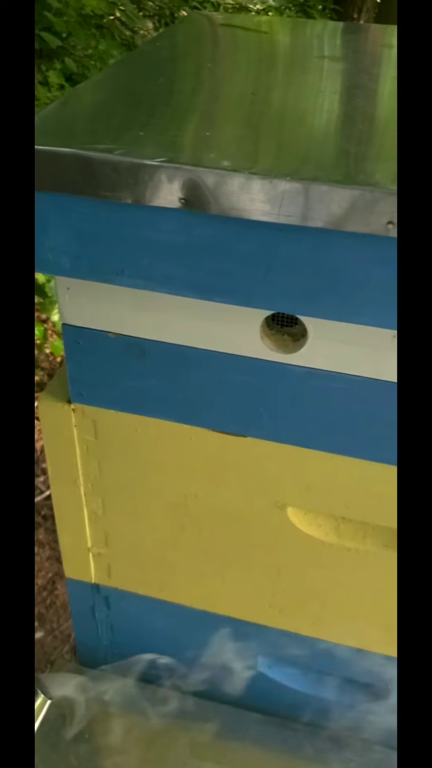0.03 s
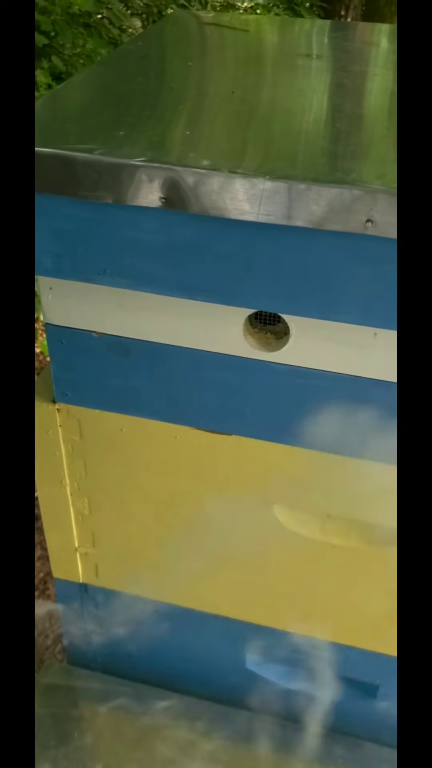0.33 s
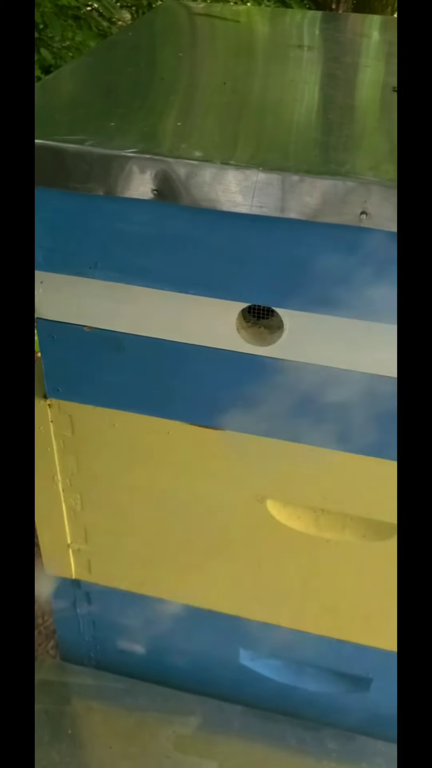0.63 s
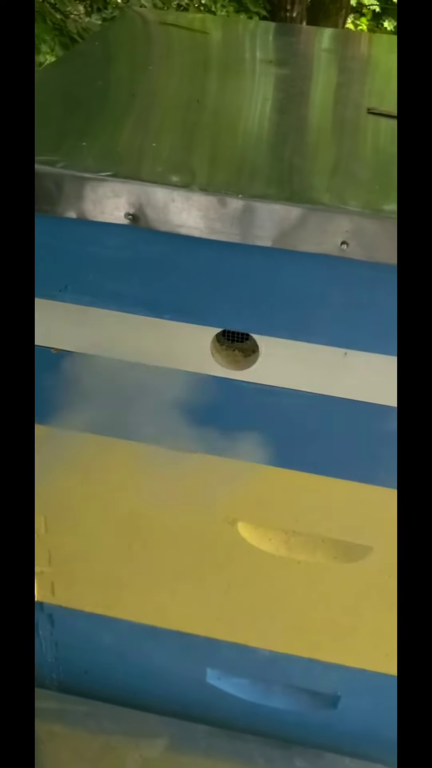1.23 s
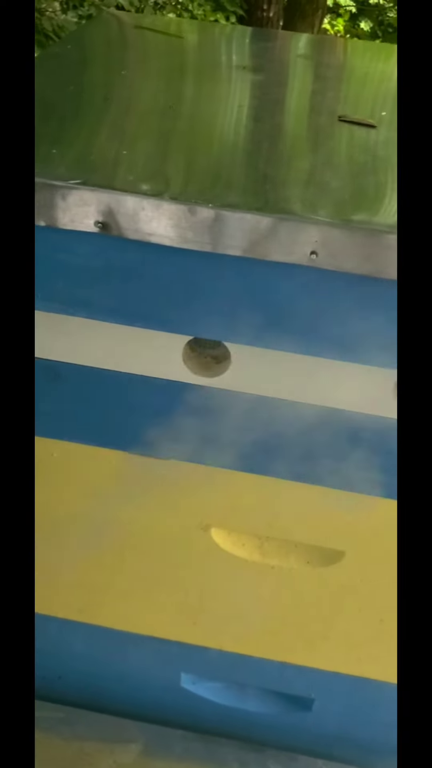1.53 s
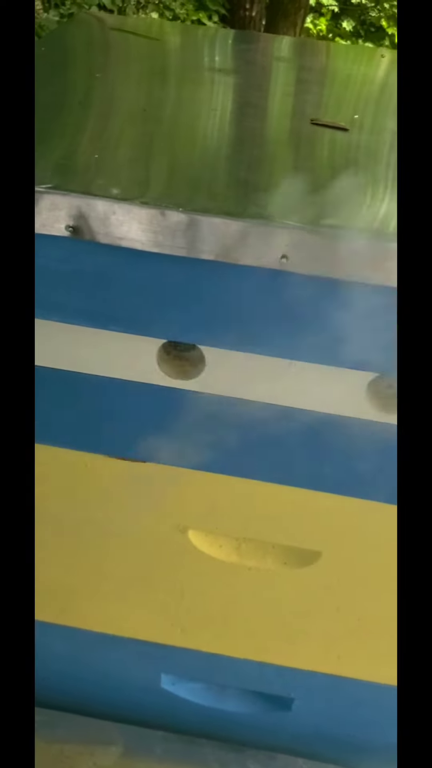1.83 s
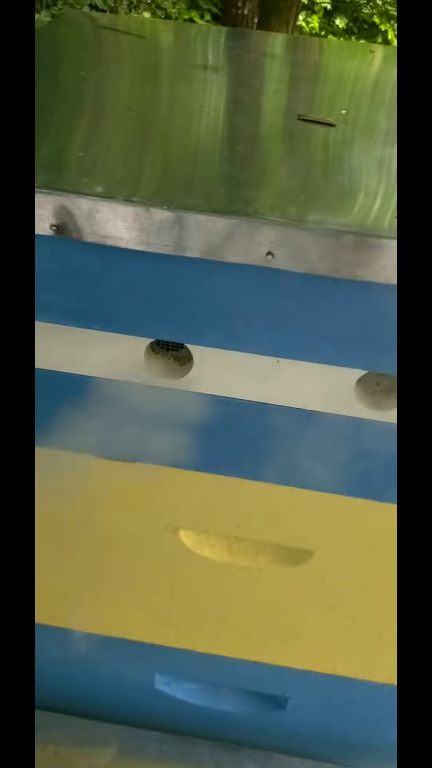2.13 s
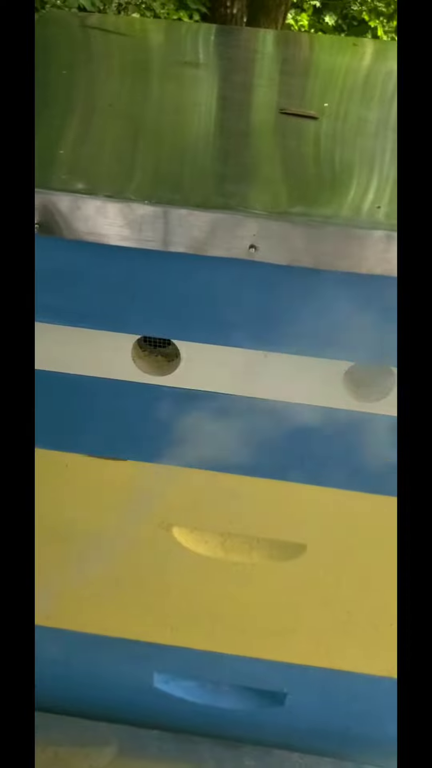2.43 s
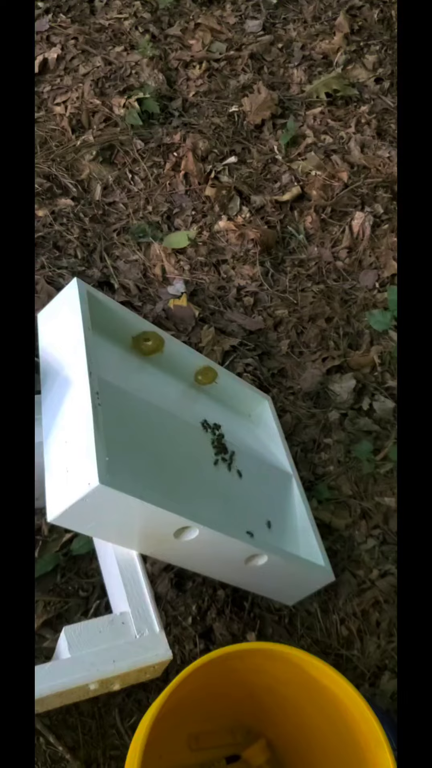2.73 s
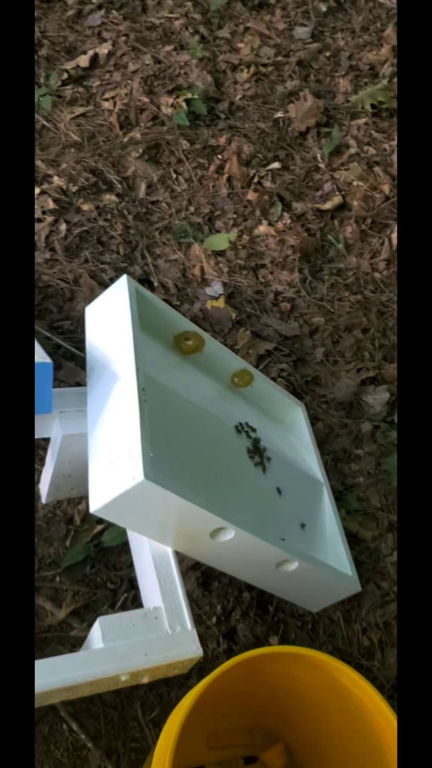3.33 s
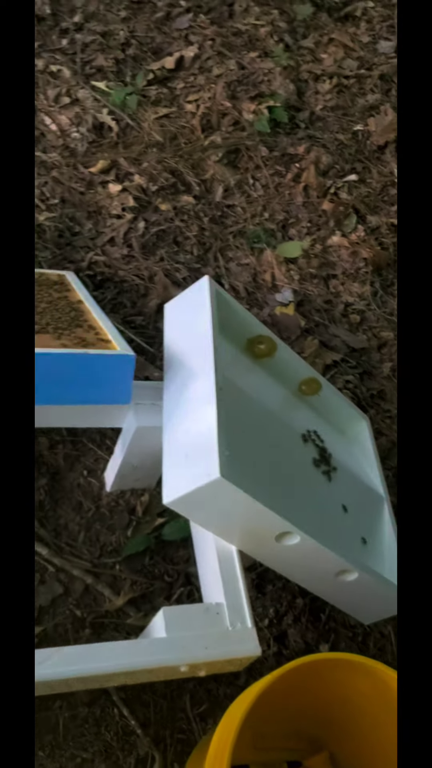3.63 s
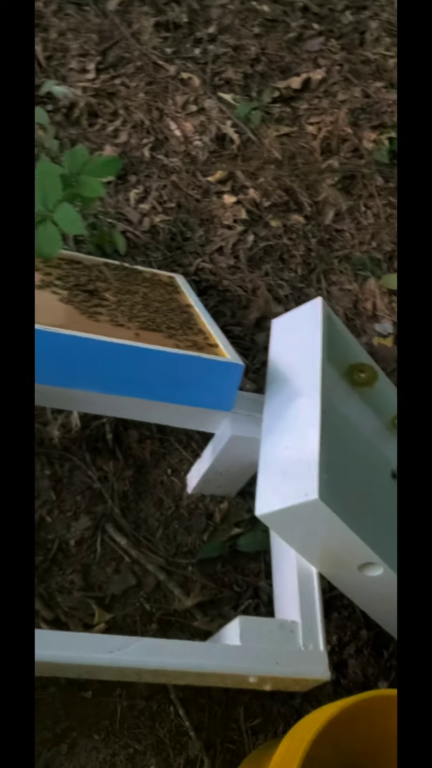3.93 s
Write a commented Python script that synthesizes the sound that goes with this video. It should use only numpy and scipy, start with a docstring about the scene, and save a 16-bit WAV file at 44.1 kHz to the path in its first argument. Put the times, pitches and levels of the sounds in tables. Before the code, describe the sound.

A bee smoker is pumped close by, about four breathy puffs a second, its bellows knocking softly between strokes. After a small bump, a blurred drone of bees comes in abruptly. Low outdoor rumble lies beneath.

```python
"""Bee smoker at the hive

A smoker is pumped eleven times, about four strokes a second. Each squeeze hums in the can and rushes
from the nozzle; the bellows spring back with a soft knock and a thin hiss of intake. Low outdoor
rumble lies beneath. After a bump, a louder rush with a blurred drone of bees comes in abruptly."""
import sys
import numpy as np
from scipy import signal
from scipy.fft import rfft, irfft
from scipy.io import wavfile
from scipy.ndimage import uniform_filter1d

SR = 44100
rng = np.random.default_rng(int(sys.argv[2]) if len(sys.argv) > 2 else 0)


def generate_wav(signal):
    """Clip the signal to [-1, 1] and save it as 16-bit WAV at the path in sys.argv[1]."""
    frames = np.transpose(np.atleast_2d(signal))
    scaled = np.clip(frames, -1, 1) * 32767
    pcm = np.round(scaled).astype(np.int16)
    wavfile.write(sys.argv[1], SR, pcm)


N = 176400
T = np.arange(N) / SR
F = np.maximum(np.arange(N // 2 + 1) * SR / N, 1)
FLICKER_HZ = 90  # base rate of the fast random wobbles in level and pitch


def undb(db):
    """Decibels to gain."""
    return 10 ** (np.asarray(db) / 20)


def unit(x):
    """Scale to rms 1."""
    return x / np.sqrt(np.mean(x ** 2))


def across(points):
    """Join (Hz, value) points on a log-frequency axis."""
    hz, value = np.array(points).T
    return np.interp(np.log(F), np.log(hz), value)


def along(points):
    """A fader ride: gain that follows (seconds, dB) points."""
    return undb(np.interp(T, *np.array(points).T))


def humps(peaks):
    """EQ curve in dB from (Hz, width in Hz, dB) resonances or dips."""
    return sum(db / (1 + (2 * (F - hz) / width) ** 2) for hz, width, db in peaks)


def pan(db):
    """Left and right gains for a level difference; positive leans left."""
    return undb(np.array([[1], [-1]]) * db / 2)


def swell(centre, width, squareness=2):
    """A bell-shaped rise and fall; more squareness flattens the top and steepens the sides."""
    return np.exp(-.5 * abs((T - centre) / width) ** squareness)


def fade(start, decay):
    """A sudden start and an exponential fall."""
    return (T > start) * np.exp(-abs(T - start) / decay)


def walk(rate_hz):
    """Smooth random drift with spread 1."""
    return unit(irfft(rfft(rng.standard_normal(N)) * np.exp(-(F / rate_hz) ** 2) * (F > 1), N))


def ring(modes):
    """Impulse response of damped modes."""
    t = T[:8192]
    return sum(undb(db) * np.cos(2 * np.pi * hz * t) * np.exp(-np.log(1000) * t / t60)
               for hz, db, t60 in modes)


# Stereo image of the open air. Each row: frequency in Hz, left-right correlation.
WIDE_IMAGE = [(60, 0.97), (150, 0.96), (300, 0.87), (600, 0.49), (1200, 0.045), (4000, 0.021)]
def noise(colour_db, pan_db=0, image=WIDE_IMAGE):
    """Coloured stereo noise at rms 1, narrow in the bass and wide in the treble."""
    mid, side = rfft(rng.standard_normal((2, N)))
    alike = np.clip(across(image), -1, 1)
    stereo = mid * np.sqrt(1 + alike) + np.array([[1], [-1]]) * side * np.sqrt(1 - alike)
    return unit(irfft(stereo * undb(colour_db) * pan(pan_db), N))


# Tone of the outdoor rumble. Each row: frequency in Hz, relative level in dB.
RUMBLE_TONE = [(20, -27), (38, -2.5), (100, 2.5), (165, -8.5), (400, -16), (800, -21.5), (1700, -31),
               (3200, -40), (7000, -48), (10000, -46.5), (16000, -54)]
# Its lean. Each row: frequency in Hz, left over right in dB.
RUMBLE_PAN = [(500, -.5), (1300, 2.5), (11000, 7)]
# Tone of the high hiss. Each row: frequency in Hz, relative level in dB.
HISS_TONE = [(1700, -25), (2450, 8.5), (3200, -17.5), (4600, -2), (7000, -18.5), (11100, 3.5), (13000, -6),
             (16000, -8)]
# Its fader ride. Each row: time in seconds, level in dB.
HISS_RIDE = [(0, -69.5), (.55, -68), (.75, -88), (2.15, -100), (2.45, -60.5), (2.75, -64), (3.05, -75),
             (3.7, -71), (3.95, -64)]
def outdoors(rumble_db=-45.5):
    """The bed: a steady low rumble and a thin hiss that comes and goes."""
    rumble = undb(rumble_db) * noise(across(RUMBLE_TONE), across(RUMBLE_PAN))
    hiss = noise(across(HISS_TONE)) * along(HISS_RIDE)
    return rumble + hiss


def bees(count=14, wing_hz=196.2, spread=.1, wander=0.0406, rolloff_db=-13.5):
    """Many wingbeats, each wandering in pitch and level, blur into one drone."""
    out = 0
    for place in np.linspace(-1, 1, count):
        hz = wing_hz * np.exp(spread * place + wander * walk(7.3))
        phase = 2 * np.pi * np.cumsum(hz) / SR
        wings = sum(undb(rolloff_db * k) * np.sin((k + 1) * phase) for k in range(4))
        out = out + wings * undb(2 * walk(4.2)) * pan(2 * rng.standard_normal())
    return unit(out)


# Tone of the low noise around the bees. Each row: frequency in Hz, relative level in dB.
DRONE_TONE = [(25, -40), (55, -5), (150, 1.5), (220, -4), (400, -10.5), (650, -23.5), (4000, -55)]
# Fader ride of that noise and the bees together. Each row: time in seconds, gain in dB.
DRONE_RIDE = [(3.07, -40.5), (3.2, -37.5), (3.42, -34), (3.55, -35), (3.68, -38.5), (4, -39.5)]
# Tone of the rush above them. Each row: frequency in Hz, relative level in dB.
RUSH_TONE = [(300, -15), (700, -1.5), (1200, -11.5), (2000, -10.5), (4000, -14.5), (7200, -23),
             (11000, -24), (16000, -28.5)]
def hive(start_s=3.07, bees_db=-6.5, rush_db=-51):
    """A steady rush and a swelling low drone with bees in it start abruptly."""
    drone = (noise(across(DRONE_TONE)) + undb(bees_db) * bees()) * along(DRONE_RIDE)
    rush = undb(rush_db) * noise(across(RUSH_TONE), pan_db=3)
    gate = np.clip((T - start_s) / 0.0013, 0, 1)
    return (drone + rush) * gate


# Handling ticks. Each row: start in seconds, gain in dB.
HANDLING_TICKS = [(2.979, -57), (2.9882, -46)]
# Their woody ring. Each row: frequency in Hz, relative level in dB, 60 dB decay time in seconds.
WOOD_MODES = [(680, 1, 0.0095), (1830, 0, 0.014), (2450, -7, 0.01), (4640, -14, .004)]
def bump(centre_s=3.004, width_s=0.0061, hz=63.4, thud_db=-33):
    """Two small woody ticks, then a low handling thud far to the right."""
    thud = -np.cos(2 * np.pi * hz * (T - centre_s)) * swell(centre_s, width_s)
    wood = ring(WOOD_MODES)
    ticks = sum(undb(db) * np.interp(T - start, T[:len(wood)], wood, left=0, right=0)
                for start, db in HANDLING_TICKS)
    return undb(thud_db) * thud * pan(-19) + ticks


# Early reflections off the hive wall and lid. Each row: delay in seconds, gain.
HIVE_REFLECTIONS = [(.00402, .36), (.0059, .22)]
def beside_hive(x, hand_sway=0.051):
    """Short reflections colour the sound and drift as the hand moves."""
    out = x
    for delay, gain in HIVE_REFLECTIONS:
        late = delay * (1 + hand_sway * np.sin(2 * np.pi * (T / T[-1] + rng.random())))
        out = out + gain * np.array([np.interp(T - late, T, channel) for channel in x])
    return out


# High whistles. Each row: start in seconds, length in seconds, mid pitch in Hz, glide in Hz a second.
GAP_WHISTLES = [(1.108, .09, 10450, 5500), (1.195, .085, 10820, 3500), (1.34, .06, 11000, 9000),
                (1.52, .05, 10480, -12000)]
def whistles(level_db=-68.5, flicker_db=4, waver=.011):
    """Faint wavering whistles of air through a narrow gap, each gliding up or down."""
    out = np.zeros(N)
    for start, length, hz, glide in GAP_WHISTLES:
        progress = np.clip((T - start) / length, 0, 1)
        flow = np.sqrt(np.sin(np.pi * progress).clip(0))
        pitch = hz * (1 + waver * walk(FLICKER_HZ)) + glide * length * (progress - .5)
        gain = undb(level_db + flicker_db * walk(FLICKER_HZ))
        out += gain * flow * np.sin(2 * np.pi * np.cumsum(pitch) / SR)
    return out * pan(3)


# Air drawn back into the bellows. Each row: centre in seconds, width in seconds, level in dB.
BREATHS = [(.44, 0.075, -61.5), (.65, 0.051, -62.5), (.885, 0.039, -61.5), (1.17, 0.13, -61.5),
           (1.397, 0.052, -57.5), (1.62, 0.035, -62.5), (1.86, 0.016, -65), (2.075, 0.028, -58.5),
           (2.31, 0.04, -59.5), (2.74, 0.18, -61.5)]
# Tone of that air. Each row: frequency in Hz, relative level in dB.
BREATH_TONE = [(800, 8.5), (2400, 6), (3300, -2), (4700, -1), (7000, -8), (9000, -4.5), (11000, 1.5),
               (13000, -6), (16000, -5)]
def intakes(flicker_db=2):
    """Thin hiss as the bellows refill, with a fast random flicker in level."""
    flow = sum(undb(db) * swell(centre, width) for centre, width, db in BREATHS)
    hiss = noise(across(BREATH_TONE), pan_db=2.5)
    return hiss * flow * undb(flicker_db * walk(2 * FLICKER_HZ))


# Knocks of the bellows. Each row: time in seconds, gain in dB, contact width in seconds,
# panel ring and suction in relative dB, share of the blow in the second contact from 0 to 1.
REBOUNDS = [(.4340, -22.5, 0.00057, 6, -10, 0.72), (0.4694, -30, 0.0019, -4, 3, 0.5),
            (0.5226, -30.5, 0.00037, -8, -15, 0), (0.5365, -29.5, 0.00063, -12, -12, 0),
            (0.6998, -27.5, 0.00055, 5, -4.5, 0.19), (0.9103, -23.5, 0.00058, 8.5, -9, 0.54),
            (1.1270, -31.5, 0.00064, 9.5, -15, 0.23), (1.4145, -16, 0.00056, 2.5, -27, 0.48),
            (1.436, -20, 0.0006, 9, -3.5, 0.08), (1.641, -23.5, 0.00054, 2, -7, 0.17),
            (2.0856, -27.5, 0.00044, 3, -7, 0), (2.3107, -28.5, 0.00048, 2, -17, 0.1),
            (2.5477, -28, 0.00054, 4, -2, 0.04)]
# Thump of the air cushion. Each row: frequency in Hz, relative level in dB, 60 dB decay in seconds.
CUSHION_MODES = [(112.4, -17.5, 0.1), (204, -2, 0.022)]
# Ring of the panels. Each row: frequency in Hz, relative level in dB, 60 dB decay in seconds.
PANEL_MODES = [(426, -2, 0.026), (567, -6.5, 0.051), (747, -5, 0.028), (1350, -12, .02)]
def knocks(suction_lead_s=0.0028, second_lag_s=0.0015, scuff_db=-32, scuff_hz=1130):
    """The bellows spring open: suction, then one or two soft contacts ring cushion and panels."""
    out = np.zeros(N)
    cushion, panels = ring(CUSHION_MODES), ring(PANEL_MODES)
    scuff = undb(scuff_db) * noise(-20 * abs(np.log2(F / scuff_hz)))  # 20 dB an octave each side
    for at, db, contact, panel_db, suction_db, share in REBOUNDS:
        blow = (1 - share) * swell(at, contact) + share * swell(at + second_lag_s, contact)
        body = signal.oaconvolve(blow / blow.sum(), cushion + undb(panel_db) * panels)[:N]
        suction = undb(suction_db) * swell(at - suction_lead_s, width=0.0018)
        out = out + undb(db) * (2 * body - suction + scuff * fade(at - contact, decay=0.018))
    return out * pan(-2)


# Stereo image of the nearby can and nozzle. Each row: frequency in Hz, left-right correlation.
CLOSE_IMAGE = [(250, .97), (1300, 0.62), (4000, 0.061), (11000, 0.1)]
def can_hum(hz, width_hz=50.3):
    """The air in the can resonates around one pitch, at a fairly even strength."""
    detune = (F / hz - hz / F) * hz / width_hz
    resonance = noise(-20 * np.log10(1 + detune ** 2 / 2), image=CLOSE_IMAGE)
    running_power = uniform_filter1d(np.mean(resonance ** 2, axis=0), size=700)
    return resonance / np.sqrt(running_power)


# Squeezes of the bellows. Each row: centre in seconds, width in seconds, jet level in dB,
# hum level in dB, can pitch in Hz.
SQUEEZES = [(0.316, 0.025, -47.5, -42.5, 215), (0.56, 0.027, -44, -39, 218), (0.788, 0.025, -47, -42, 215),
            (1.016, 0.025, -48.5, -41.5, 213), (1.289, 0.025, -40.5, -41, 234),
            (1.522, 0.027, -46.5, -40.5, 231), (1.759, 0.028, -47, -45.5, 230),
            (1.975, 0.025, -52, -41.5, 233), (2.207, 0.029, -51, -40, 200.5),
            (2.439, 0.033, -49.5, -39.5, 217), (2.622, 0.023, -52, -42.5, 218)]
# Tone of the jet. Each row: frequency in Hz, relative level in dB.
JET_TONE = [(150, -7), (400, -4), (750, -3), (1200, 2.5), (1700, -2.5), (2600, -7.5), (3500, -9),
            (4500, -12), (5400, -17), (7000, -19.5), (10000, -15), (16000, -21.5)]
# Hollow colour of the nozzle. Each row: centre in Hz, width in Hz, boost or cut in dB.
NOZZLE_EQ = [(1224, 110, 1), (1765, 90, 2.5), (3550, 170, -1), (4660, 330, 2.5)]
# Aim of the nozzle, bass right and treble left. Each row: frequency in Hz, left over right in dB.
NOZZLE_PAN = [(300, -7.5), (1400, -1.5), (4000, 3), (11000, 9.5)]
def puffs(sputter_db=1.1, hum_stretch=1.36):
    """Each squeeze drives a sputtering jet; the can hums a little longer, its pitch set per stroke."""
    jet = noise(across(JET_TONE) + humps(NOZZLE_EQ), across(NOZZLE_PAN), CLOSE_IMAGE)
    jet = unit(beside_hive(jet))
    flow = sum(undb(db) * swell(centre, width, squareness=2.23) for centre, width, db, _, _ in SQUEEZES)
    hum = sum(undb(db) * swell(centre, width * hum_stretch, squareness=3.1) * can_hum(hz)
              for centre, width, _, db, hz in SQUEEZES)
    sputter = undb(sputter_db * walk(FLICKER_HZ))
    return jet * flow * sputter + hum * pan(-1)


def from_right(x, lag_s):
    """The smoker is to the right, so the left channel hears it a little later."""
    return np.array([np.interp(T - lag_s, T, x[0]), x[1]])


def scene():
    """The smoker close by, its nozzle nearer the centre than its bellows, over the background."""
    bellows = from_right(knocks() + beside_hive(intakes()), lag_s=0.000225)
    nozzle = from_right(puffs(), lag_s=0.00015)
    return nozzle + bellows + whistles() + outdoors() + bump() + hive()


# A narrow dip in the microphone's treble. Each row: centre in Hz, width in Hz, gain in dB.
MIC_EQ = [(7400, 750, -3)]
def record(dry, low_hz=31, top_hz=15800):
    """The microphone has a dip in the treble; the recorder cuts the deepest bass and the top."""
    low_cut = 1 / np.sqrt(1 + (low_hz / F) ** 12)
    high_cut = np.clip((top_hz - F) / 100 + 1, 0, 1)
    return irfft(rfft(dry) * undb(humps(MIC_EQ)) * low_cut * high_cut, N)


dry = scene()
out = record(dry)
generate_wav(out)
```